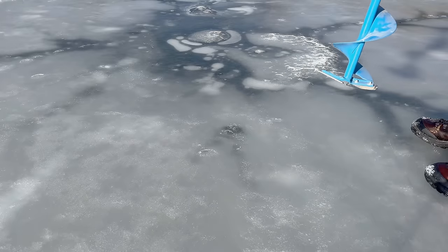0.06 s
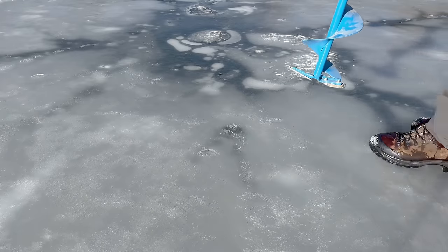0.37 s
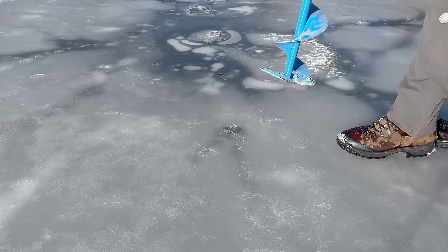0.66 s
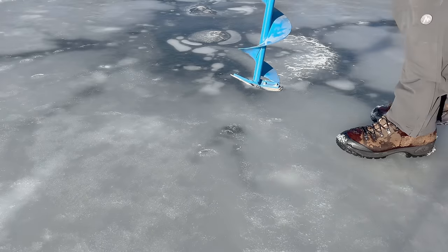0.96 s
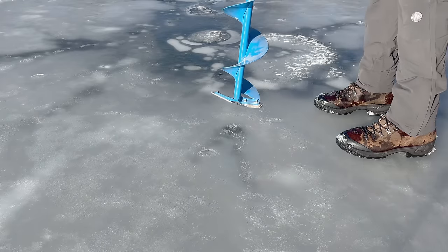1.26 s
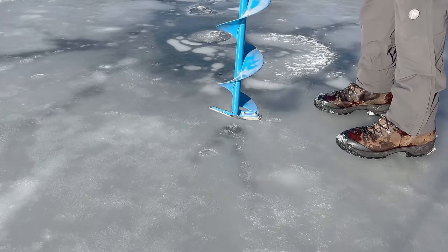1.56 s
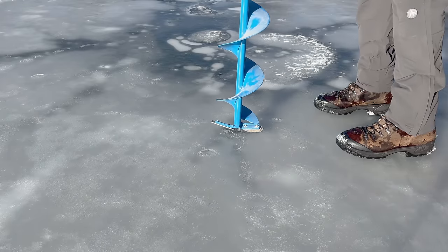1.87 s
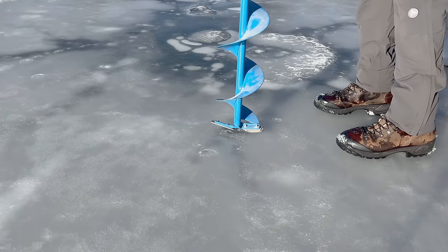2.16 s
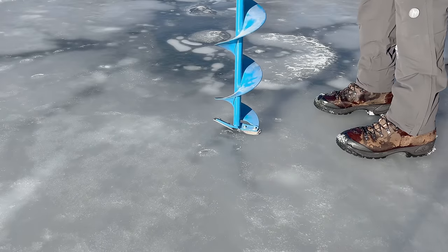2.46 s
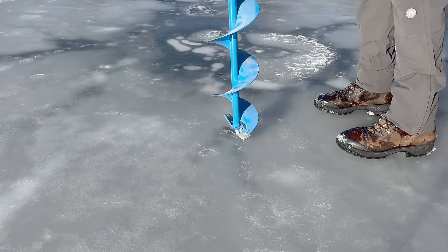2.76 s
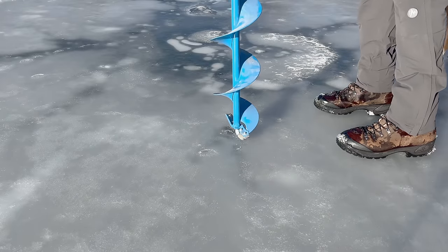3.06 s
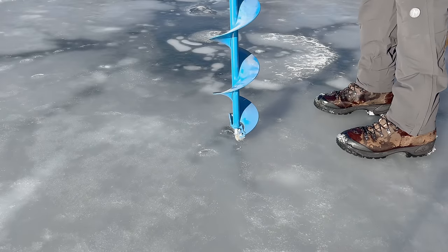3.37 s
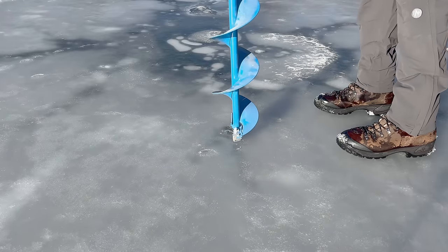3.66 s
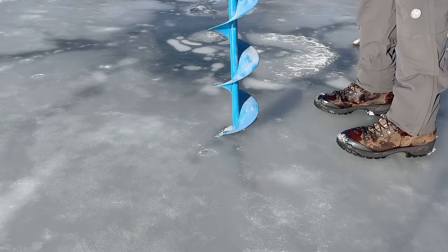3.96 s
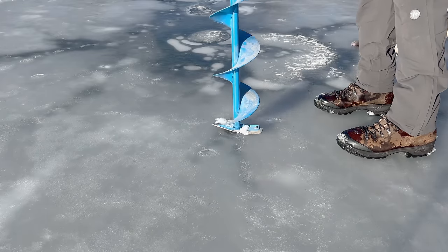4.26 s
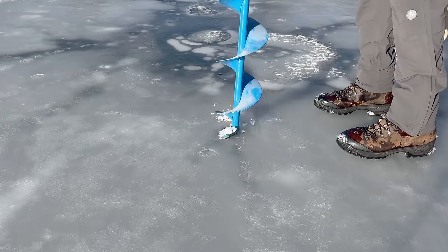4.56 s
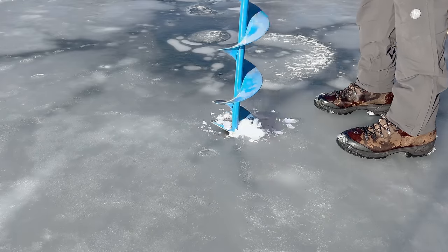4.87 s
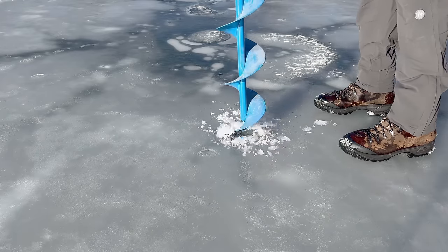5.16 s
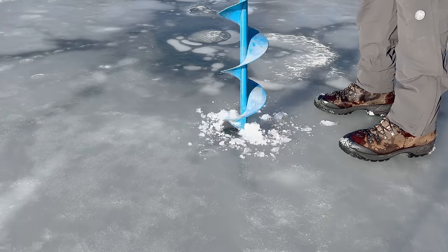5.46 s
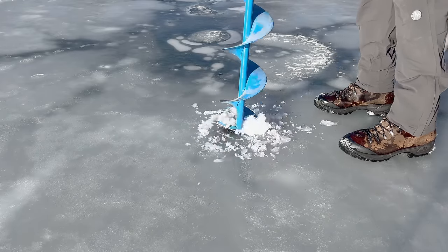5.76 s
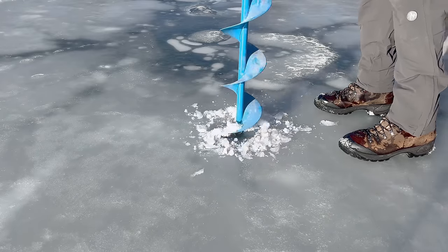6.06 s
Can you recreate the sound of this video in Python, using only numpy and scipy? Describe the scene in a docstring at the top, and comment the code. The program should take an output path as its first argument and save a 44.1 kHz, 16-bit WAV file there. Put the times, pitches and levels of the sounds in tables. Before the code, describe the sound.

Boots crunch on lake ice, then a hand auger clanks down, scrapes, and starts grinding and chipping into the ice.

```python
"""A frozen lake in the open air, heard through two closely spaced microphones.
Boots crunch up, breaking the crust by brittle fracture, and a steel hand auger is set down on the ice.
As it is cranked, the blades first skate in short stick-slip scrapes while the handle clacks, then bite:
they shave and chip the ice. These forces shake the ice sheet and drive the modes of the steel spiral."""
import sys
import numpy as np
from scipy import signal
from scipy.fft import rfft, irfft, next_fast_len
from scipy.io import wavfile

SR = 44100
rng = np.random.default_rng(int(sys.argv[2]) if len(sys.argv) > 2 else 0)


def unload_audio(sound):
    """Save the sound as a 16-bit wav file, at the path given as the first command line argument."""
    columns = np.transpose(np.atleast_2d(sound))
    # keep every value between -1 and 1, then stretch to whole-number steps
    steps = np.round(np.clip(columns, -1, 1) * 32767)
    wavfile.write(sys.argv[1], SR, steps.astype(np.int16))


N = 269892
TIME = np.arange(N) / SR


def from_db(db):
    """Amplitude ratio of a level in decibels."""
    return 10 ** (np.asarray(db) / 20)


def unit_rms(x):
    """Normalisation to unit power."""
    return x / np.sqrt(np.mean(x ** 2) + 1e-20)


def envelopes(rows):
    """Linear interpolation in decibels: one gain curve per level column, silent outside its span."""
    times, *columns = np.transpose(rows)
    inside = (TIME >= times[0]) * (TIME <= times[-1])
    return [from_db(np.interp(TIME, times, column)) * inside for column in columns]


def over_hz(rows, at):
    """Interpolation of each column on a logarithmic frequency axis."""
    hz, *columns = np.transpose(rows)
    return [np.interp(np.log(at), np.log(hz), column) for column in columns]


def response(spectrum, size=8192):
    """Minimum-phase impulse response of a spectrum, falling 24 dB per octave beyond its ends."""
    hz = np.maximum(np.arange(size // 2 + 1) * SR / size, 1)
    octaves_out = np.abs(np.log2(hz / np.clip(hz, spectrum[0][0], spectrum[-1][0])))
    level_db = np.maximum(over_hz(spectrum, hz)[0] - 24 * octaves_out, -90)
    cepstrum = irfft(np.log(from_db(level_db)))[:size // 2]
    cepstrum[1:] *= 2
    return irfft(np.exp(rfft(cepstrum, size)))[:size // 2]


def through(x, impulse):
    """Convolution of each path with an impulse response."""
    return signal.oaconvolve(x.astype(np.float32), impulse[None].astype(np.float32), axes=1)[:, :N]


def coloured(x, spectrum):
    """Source-filter model: a steady excitation takes on a spectrum, at unit power."""
    return unit_rms(through(x, response(spectrum)))


def knock(force, spectrum):
    """Response of a heavily damped body: a unit impulse gives a peak of 1."""
    impulse = response(spectrum)
    return through(force, impulse / np.abs(impulse).max())


def ring(hz, t60):
    """Free vibration of a struck mode: a damped sine of unit amplitude."""
    t = TIME[:SR // 3]
    return np.sin(2 * np.pi * hz * t) * np.exp(-np.log(1000) * t / t60)


def resonate(hz, t60):
    """Forced vibration: impulse response of a mode with unit gain at resonance."""
    t, damping = TIME[:SR // 3], np.log(1000) / t60
    return 2 * damping / SR * np.cos(2 * np.pi * hz * t) * np.exp(-damping * t)


def decay_from(start, decay_s):
    """Exponential decay from a sudden onset, lasting twenty time constants."""
    age = (TIME - start) / decay_s
    return (age >= 0) * (age < 20) * np.exp(-np.clip(age, 0, 20))


def drift(rate):
    """Random modulation: straight lines between Gaussian values, rate of them a second."""
    return np.interp(TIME * rate, np.arange(N // 20), rng.standard_normal(N // 20))


def shifting(x, depth, rate, q=18, count=16):
    """Randomly modulated resonances: treble peaks come and go independently."""
    pitches = np.geomspace(2200, 9000, count) * rng.uniform(.98, 1.02, count)
    peaks = (signal.lfilter(*signal.iirpeak(hz, q, fs=SR), x) for hz in pitches)
    return unit_rms(x + depth * sum(drift(rate) * peak for peak in peaks))


def grains(per_s, spread_db, clump_db, clump_rate):
    """Shot noise: tiny impulses of uneven size, independent on three paths but swelling together."""
    clicks = np.zeros((3, N))
    born = rng.random((3, N)) < per_s / SR
    sizes = from_db(spread_db * np.minimum(rng.exponential(1, born.sum()), 4))
    clicks[born] = sizes * rng.choice([-1, 1], born.sum())
    return clicks * from_db(clump_db * np.clip(drift(clump_rate), -2, 2))


# The three rows of an excitation are the direct, left-scattered and right-scattered paths: (delay [s])
PATH_DELAYS = [0, .0007, .0012]
def contacts(rows, crumble, crumble_s):
    """Impact force: for each (time [s], level [dB]), an impulse and a decaying shower of smaller ones."""
    force = np.zeros((3, N + SR))
    decay = np.exp(-TIME[TIME < 7 * crumble_s] / crumble_s)
    for s, level_db in rows:
        blow = crumble * decay * rng.standard_normal((3, len(decay)))
        blow[:, 0] += 1
        for path, delay in enumerate(PATH_DELAYS):
            start = int((s + delay) * SR)
            force[path, start:start + len(decay)] += from_db(level_db) * blow[path]
    return force[:, :N]


def stray_clicks(per_s, spread_db):
    """Poisson process: lone impulses, each arriving along all three paths."""
    clicks, born = np.zeros(N), rng.random(N) < per_s / SR
    clicks[born] = from_db(spread_db * rng.uniform(-1.1, 1, N)[born])
    return np.array([np.roll(clicks, int(delay * SR)) for delay in PATH_DELAYS])


def stroke(length, swell_db, attack_s=0.03, release_s=0.027, swell_share=0.79):
    """Envelope of sliding friction: the contact catches, swells to full level and lets go."""
    age = TIME[:SR]
    attack = np.clip(age / attack_s, 0, 1)
    release = np.exp(-np.maximum(age - length, 0) / release_s)
    swell = from_db(-swell_db * np.clip(1 - age / (swell_share * length), 0, 1))
    return attack * release * swell


def stick_slip(rows, stutter_db=3, stutter_per_s=60):
    """Stick-slip friction drives one resonance per stroke; the tone takes the energy of the stroke."""
    out = np.zeros((3, N + 2 * SR))
    for start, length, hz, t60, level_db in rows:
        friction = rng.standard_normal((3, SR)) * stroke(length, swell_db=3.5)
        friction *= from_db(stutter_db * (drift(stutter_per_s)[:SR] + 0.5))
        tone = signal.fftconvolve(friction, resonate(hz, t60)[None], axes=1)
        tone *= (np.linalg.norm(friction, axis=1) / np.linalg.norm(tone, axis=1))[:, None]
        first = int(start * SR)
        out[:, first:first + tone.shape[1]] += from_db(level_db) * tone
    return out[:, :N]


# Spectrum of the hush over the lake: (frequency [Hz], level [dB])
AIR_SPECTRUM = [(15, -30), (25, -17), (59, -10.5), (114, -10), (1040, -17), (1230, -18.5), (3160, -24.5),
                (3430, -26), (5730, -26), (13600, -30), (16000, -41)]
def open_air():
    """Partially coherent noise: a faint hush, part of it common to both microphones."""
    hush = coloured(rng.standard_normal((3, N)), AIR_SPECTRUM)
    return from_db(-67.5) * (0.55 * hush[0] + hush[1:])


def low_rumble(pressure, full_lean_db=-35.5, exponent=2.9):
    """Amplitude-modulated noise: a faint low rumble that swells during the heaviest cutting."""
    swell = (pressure / from_db(full_lean_db)) ** exponent
    return from_db(-65) * swell * coloured(rng.standard_normal((3, N)), [(30, -4), (60, 10), (100, 2)])


# Spectrum of rubbing cloth: (frequency [Hz], level [dB])
CLOTH_SPECTRUM = [(1470, -7.5), (2500, -4), (4650, -3.5), (5270, -5), (7770, -5.5), (14200, -9),
                  (15200, -9), (16000, -29)]
def trousers(gain):
    """Friction noise: dense tiny slips of cloth merge into a swish."""
    cloth = coloured(grains(per_s=14000, spread_db=4.5, clump_db=1.8, clump_rate=21.6), CLOTH_SPECTRUM)
    return from_db(1.1) * gain * shifting(cloth, depth=0.4, rate=46)


# Pieces of grit cracking under a boot: (time [s], level [dB], frequency [Hz])
GRIT_CRACKS = [(.5522, -28, 4750), (0.5561, -22, 5500), (0.5563, -26, 8200), (.5922, -30, 3570),
               (.602, -33, 3490), (.6345, -34, 4500), (.6842, -28, 5170), (0.6878, -26, 3880),
               (0.6905, -19, 1900), (0.695, -26.5, 3250), (0.712, -26, 4730), (0.741, -30, 4500),
               (.7458, -32, 7840), (1.0715, -32.5, 6700), (1.229, -38.5, 10300)]
# Spectrum of their ticks: (frequency [Hz], level [dB])
GRIT_SPECTRUM = [(1500, 11), (3800, -1), (8000, -2), (15000, -11)]
def grit(fine_grit):
    """Brittle fracture: each piece ticks and pings at its natural frequency; fine grit only ticks."""
    pings = np.zeros((3, N))
    for s, level_db, hz in GRIT_CRACKS:
        crack = contacts([(s, level_db)], crumble=0.066, crumble_s=.002)
        pings += through(crack, ring(hz, t60=0.0052)[:SR // 20])
    cracks = contacts([row[:2] for row in GRIT_CRACKS], crumble=0.062, crumble_s=.002)
    return from_db(-2) * pings + knock(from_db(-3.5) * cracks + fine_grit, GRIT_SPECTRUM)


# Snaps of the ice crust under a sole: (time [s], level [dB])
CRUST_SNAPS = [(0.092, -27), (0.15, -21.5), (0.182, -28), (0.202, -25), (0.222, -25.5), (0.246, -23.5),
               (0.26, -24.5), (0.282, -27), (0.323, -25), (0.348, -20), (0.374, -26), (0.433, -26),
               (0.467, -29), (0.493, -20), (0.524, -38), (0.542, -38), (0.574, -17.5), (0.606, -26.5),
               (0.615, -18), (0.639, -23.5), (0.711, -34), (0.788, -28), (0.85, -26), (0.875, -28),
               (0.899, -39), (0.954, -39), (1.097, -28.5), (1.145, -28), (1.162, -33), (1.177, -27),
               (1.24, -39), (1.255, -39), (1.267, -32), (1.31, -29), (1.355, -47), (1.394, -35),
               (1.419, -36.5), (1.44, -35), (1.466, -42), (1.579, -40.5), (1.601, -52), (1.675, -51),
               (1.845, -49), (2.084, -56), (2.173, -49), (2.315, -50)]
# Spectrum of a snap: (frequency [Hz], level [dB])
SNAP_SPECTRUM = [(40, -25), (200, 1.5), (450, 6), (700, -3.5), (1000, -9.5), (1600, -7.5), (2600, -23),
                 (6000, -69), (15000, -45)]
def crust(gain, first_crack_db=-11, give_s=.0016):
    """Two-stage fracture: a faint crack, then the crust gives way; lesser snaps fill the gaps."""
    first_cracks = [(s, level_db + first_crack_db) for s, level_db in CRUST_SNAPS]
    breaks = [(s + give_s, level_db) for s, level_db in CRUST_SNAPS]
    lesser = from_db(8.5) * gain * stray_clicks(per_s=30, spread_db=3.0)
    return knock(contacts(first_cracks + breaks, crumble=0.06, crumble_s=0.003) + lesser, SNAP_SPECTRUM)


# Footfalls: (time [s], heel level [dB], loss per slap [dB], roll level [dB])
FOOTFALLS = [(0.6736, -18.5, 17, -50), (1.0395, -15.5, 6, -30)]
# Spectrum of a sole on ice: (frequency [Hz], level [dB])
THUD_SPECTRUM = [(40, -23), (100, -2.5), (165, 1.5), (230, -0.5), (330, -4), (600, -15.5), (1500, -38)]
def footfalls(slap_gap_s=.0142, roll_s=0.091):
    """Impact excitation: heel, ball and toe slap, the sole rolls flat; the heaviest slap rings the ice."""
    slaps = [(s + k * slap_gap_s, heel_db - k * loss_db)
             for s, heel_db, loss_db, _ in FOOTFALLS for k in range(3)]
    roll = sum(from_db(roll_db) * decay_from(s, roll_s) for s, _, _, roll_db in FOOTFALLS)
    soles = roll * coloured(grains(per_s=500, spread_db=2, clump_db=-2, clump_rate=110), THUD_SPECTRUM)
    thuds = knock(contacts(slaps, crumble=0.012, crumble_s=0.007), THUD_SPECTRUM)
    heaviest = max(slaps, key=lambda row: row[1])
    sheet = through(contacts([heaviest], crumble=0.011, crumble_s=0.026), ring(hz=178, t60=.25))
    return thuds + soles + from_db(-8) * sheet


# Walking up and coming to rest: (time [s], crunch level [dB], swish level [dB])
WALK_LEVELS = [(0.0, -39.5, -47), (0.206, -44.5, -55.5), (0.4, -44.5, -49.5), (0.532, -41, -46.5),
               (0.72, -40, -48.5), (0.87, -39.5, -50), (1.018, -44, -54), (1.068, -40.5, -47.5),
               (1.282, -47, -57.5), (1.56, -62, -68), (1.732, -75, -88), (1.82, -82.5, -88)]
# Spectrum of crust ground underfoot: (frequency [Hz], level [dB])
CRUNCH_SPECTRUM = [(15, -54), (25, -11), (49, -1.5), (133, -4.5), (173, -3.5), (421, -4.5), (535, -3.5),
                   (962, -6), (1620, -9.5), (3470, -20), (4500, -28), (5850, -60), (9900, -120)]
# Squeaks of rubber soles: (start [s], duration [s], frequency [Hz], t60 [s], level [dB])
RUBBER_SQUEAKS = [(0.705, 0.027, 890, .03, -41.5), (0.845, 0.017, 950, 0.017, -45),
                  (1.345, 0.014, 1240, 0.027, -49.5)]
def boots():
    """Granular crushing: many small fractures make the crunch, joined by the other sounds of walking."""
    crunch_gain, swish_gain = envelopes(WALK_LEVELS)
    fractures = grains(per_s=3000, spread_db=1.5, clump_db=2.0, clump_rate=120)
    crunch = crunch_gain * coloured(fractures, CRUNCH_SPECTRUM)
    swish = trousers(swish_gain)
    fine_grit = from_db(3.5) * swish_gain * stray_clicks(per_s=14, spread_db=6.0)
    return crunch + swish + crust(crunch_gain) + grit(fine_grit) + footfalls() + stick_slip(RUBBER_SQUEAKS)


# Modes of the steel spiral: (frequency [Hz], t60 [s], struck [dB], skating [dB], biting [dB])
SPIRAL_MODES = [(180, .16, -24, 9, -8), (487, .28, -30, 0, -1), (535, .15, -30, -10, -5),
                (609, .15, -16, -5, -7), (850, .24, -30, 3, -3), (975, .12, -24, 2, 4),
                (1049, .18, -12, -14, -16), (1105, .1, -19, -5, -3), (1228, .22, -16, 8, -4),
                (1344, .44, -19.5, -5, 7), (1420, .19, -16, -20, -8), (1509, .1, -26, -12, -7),
                (1750, .33, -31, -14, -18), (1946, .12, -19, -12, -10), (2110, .25, -24, -14, -20),
                (2210, .13, -18, 2, -15), (2363, .13, -18, 0, -12), (2420, .16, -21, 1, -10),
                (2490, .18, -23, -8, -8), (2557, .2, -21, -6, -1), (2640, .16, -23, -8, -10),
                (2790, .12, -21, -6, -12), (2920, .14, -25, -8, -10), (3343, .45, -40, -2, -6),
                (3555, .3, -39, -10, -19), (3600, .25, -43, -10, -17), (3700, .12, -31, -3, -8),
                (3963, .1, -38, -14, -13), (4155, .085, -11, -2, -7), (4478, .25, -36, -8, -7),
                (4752, .14, -27, 0, -3), (4960, .1, -24, 2, -4), (5165, .17, -28, 0, -12),
                (5329, .15, -33, -8, -9), (5735, .18, -27, 1, -6), (5947, .14, -16, -20, -26),
                (6174, .12, -36, -10, -3), (6934, .15, -35, -12, -5), (7366, .15, -28, -12, -4),
                (7418, .16, -22, -16, -20), (7505, .16, -19, -12, -11), (7666, .14, -26, -14, -16),
                (7865, .17, -28, -14, -16), (8080, .12, -33, 1, -9), (8470, .12, -38, 3, -16),
                (10965, .09, -20, 2, -18)]
# Shared by the many weak modes of its thin rim: (t60 [s], struck [dB], skating [dB], biting [dB])
RIM_MODES = (0.13, -42.5, -2, -4)
STRUCK, SKATING, BITING = range(3)
def spiral(mode, contact):
    """Modal superposition: the auger's impulse response, weighted by the kind of contact."""
    main = sum(from_db(levels[contact]) * mode(hz, t60) for hz, t60, *levels in SPIRAL_MODES)
    rim_t60, *rim_levels = RIM_MODES
    pitches = np.geomspace(1600, 11500, 90) * rng.uniform(.98, 1.02, 90)
    rim = sum(rng.uniform(-.8, 1) * mode(hz, rim_t60) for hz in pitches)
    return main + from_db(rim_levels[contact]) * rim


# The blades land and rattle to rest: (time [s], level [dB])
LANDING_BLOWS = [(1.8778, -22), (1.8811, -13.5), (1.8843, -15.5), (1.8945, -15.5), (1.922, -31),
                 (1.9315, -30), (1.9445, -33.5)]
# Spectra of the splintering surface and of the struck ice sheet: (frequency [Hz], level [dB])
CRUSH_SPECTRUM = [(29, -62), (70, -23), (171, -4), (428, -19), (601, -38), (678, -9), (1070, -3),
                  (2270, -9), (2750, -11), (3100, -17), (4040, -19), (5670, -15), (7570, -15.5),
                  (8600, -24), (11100, -23), (16000, -47)]
BOOM_SPECTRUM = [(30, -19), (60, -13), (100, -14), (150, -1.5), (200, -4.5), (320, -16), (900, -16),
                 (2500, -28.5)]
def landing():
    """Inelastic impact: the blades crush the surface, the sheet booms, the hardest blow rings the steel."""
    crush = knock(contacts(LANDING_BLOWS, crumble=0.16, crumble_s=.011), CRUSH_SPECTRUM)
    hardest = max(LANDING_BLOWS, key=lambda row: row[1])
    steel = through(contacts([hardest], crumble=.012, crumble_s=.008), spiral(ring, STRUCK))
    boom = knock(contacts(LANDING_BLOWS, crumble=0.087, crumble_s=0.075), BOOM_SPECTRUM)
    return from_db(-2) * crush + from_db(-1) * steel + from_db(-22) * boom


# Knocks of the crank handle: (time [s], level [dB])
HANDLE_CLACKS = [(2.283, -54), (2.2905, -47), (2.297, -49), (2.9895, -44), (3.008, -44), (3.0813, -33),
                 (3.587, -35), (3.593, -42)]
# Spectrum of a clack: (frequency [Hz], level [dB])
CLACK_SPECTRUM = [(100, -14), (450, 3.5), (900, 3.5), (1350, 4), (1800, -1), (2600, -11), (4000, -25),
                  (12000, -46)]
def handle(rebound_s=0.00322, rebound_db=-13):
    """Backlash: play in the handle ends in an impact that rebounds once."""
    rebounds = [(s + rebound_s, level_db + rebound_db) for s, level_db in HANDLE_CLACKS]
    return knock(contacts(HANDLE_CLACKS + rebounds, crumble=0.096, crumble_s=0.0059), CLACK_SPECTRUM)


# Squeals of a sticking blade: (start [s], duration [s], frequency [Hz], t60 [s], level [dB])
BLADE_SQUEALS = [(2.31, .1, 1200, .05, -75), (2.45, 0.19, 1226, 0.18, -58.5),
                 (2.71, 0.047, 1117, 0.059, -50), (3.235, 0.042, 3345, 0.34, -65),
                 (2.72, 0.072, 2190, .08, -57), (2.73, 0.062, 4930, .04, -59), (2.74, .06, 5120, .08, -58),
                 (3.68, 0.12, 4165, 0.18, -52.5), (3.705, .11, 2520, .05, -61),
                 (3.705, 0.1, 2350, 0.091, -54.5), (3.686, 0.11, 985, 0.22, -48),
                 (3.68, 0.13, 843, 0.16, -53), (3.971, 0.42, 995, 0.093, -43.5),
                 (4.15, 0.13, 3774, 0.027, -47.5), (4.46, 0.055, 1358, 0.13, -36.5),
                 (4.546, 0.078, 1371, 0.16, -33), (4.6, .45, 1353, 0.46, -44), (4.99, 0.08, 1344, 0.2, -36),
                 (5.21, 0.1, 974, 0.054, -38.5), (5.59, .08, 1338, .12, -35.5), (5.6, .08, 1090, .04, -38),
                 (4.54, .6, 4900, .025, -46.5), (4.28, .65, 3760, .035, -49)]
# The steel is let go from a strain: (time [s], frequency [Hz], t60 [s], level [dB])
STRAIN_RELEASES = [(3.084, 1337, 0.29, -53), (3.31, 3345, .55, -62)]
def singing_steel():
    """Forced and free vibration: stick-slip makes the steel sing; on release it rings in one mode."""
    out = stick_slip(BLADE_SQUEALS)
    for s, hz, t60, level_db in STRAIN_RELEASES:
        out += through(contacts([(s, level_db)], crumble=0, crumble_s=.001), ring(hz, t60))
    return out


# Skating strokes: (start [s], duration [s], final level [dB], swell [dB], relative chatter [dB])
BLADE_SCRAPES = [(2.297, 0.066, -74, 1, 4), (2.375, 0.29, -58.5, 6.5, 1.5), (2.665, 0.13, -47.5, 13, 1.5),
                 (2.855, 0.067, -62, -1, 1), (3.082, .081, -71.5, -7, 3), (3.17, 0.13, -52, 12, 1),
                 (3.487, .17, -65.5, 0, 2.5), (3.661, .04, -52.5, -6, -1), (3.698, 0.12, -46, 4.5, -1)]
def scraping(pressure_db=-3):
    """Sliding friction: envelopes of pressure, chatter and shaving while the blades skate."""
    gains = np.zeros((3, N))
    for start, length, level_db, swell_db, chatter_db in BLADE_SCRAPES:
        first = int(start * SR)
        mix = from_db([[pressure_db], [chatter_db], [0]])
        gains[:, first:first + SR] += from_db(level_db) * mix * stroke(length, swell_db)
    return gains


# Weight on the handle, as the shaking of the ice: (time [s], level [dB])
HANDLE_LEAN = [(3.84, -60), (3.95, -55), (4.1, -46.5), (4.25, -42), (4.4, -43), (4.6, -38.5), (4.85, -38.5),
               (5.04, -38), (5.18, -48), (5.25, -43.5), (5.4, -42), (5.57, -40.5), (5.8, -40.5),
               (5.85, -50), (5.91, -44), (6.0, -49.5), (6.12, -42)]
# Cranking speed, as the strength of shaving; it sags as the handle comes round: (time [s], level [dB])
CRANK_SPEED = [(3.84, -70), (3.89, -54.5), (4.08, -42.5), (4.14, -51), (4.22, -38), (4.53, -39.5),
               (4.56, -39.5), (4.7, -37.5), (4.98, -39.5), (5.02, -36), (5.15, -40), (5.19, -45),
               (5.23, -35.5), (5.27, -40), (5.35, -48.5), (5.45, -39.5), (5.82, -36), (5.85, -42),
               (5.89, -35.5), (6.0, -48.5), (6.06, -41), (6.12, -35.5)]
# The blades dig in and judder: (centre time [s], duration [s], extra chatter [dB])
BLADE_JUDDERS = [(4.455, 0.13, 5), (4.59, 0.042, 6.5), (5.024, 0.058, 5), (5.257, 0.079, 3.5),
                 (5.486, 0.32, 4), (5.62, 0.14, 6)]
def cutting(lean_share=0.32):
    """Envelopes of pressure, chatter and shaving in the cut: chatter is a power law of load and speed."""
    lean, speed = envelopes(HANDLE_LEAN)[0], envelopes(CRANK_SPEED)[0]
    judder_db = sum(db * np.exp(-(2 * (TIME - s) / length) ** 2) for s, length, db in BLADE_JUDDERS)
    chatter = from_db(3.5 + judder_db) * lean ** lean_share * speed ** (1 - lean_share)
    return np.array([lean, chatter, from_db(-1.5) * speed])


# Spectrum of the shaken ice sheet: (frequency [Hz], level [dB])
SHEET_SPECTRUM = [(24, -50), (40, -53), (102, -18.5), (179, -10), (200, -6), (269, -11.5), (334, -3),
                  (415, -6), (472, -3), (610, -4), (767, -9), (850, -3.5), (1100, -19), (1870, -120)]
def ice_sheet(pressure):
    """Forced vibration: the blades shake the ice sheet in proportion to their pressure."""
    jolts = grains(per_s=900, spread_db=2.5, clump_db=2.0, clump_rate=70)
    return from_db(-1.5) * pressure * coloured(jolts, SHEET_SPECTRUM)


# Spectrum of blade chatter: (frequency [Hz], level [dB])
CHATTER_SPECTRUM = [(500, -22), (780, -5.5), (950, 2), (1150, 5.5), (1360, 3), (1520, -10.5), (2200, -6.5),
                    (3500, -46)]
def blade_chatter(gain):
    """Intermittent contact: rapid small blows of the blades merge into a midrange bark."""
    blows = grains(per_s=700, spread_db=1.5, clump_db=1.5, clump_rate=90)
    return from_db(-7) * gain * coloured(blows, CHATTER_SPECTRUM)


# Spectrum of shaved ice: (frequency [Hz], level [dB])
SHAVING_SPECTRUM = [(700, -10), (1600, -2), (2200, -3), (2900, -2.5), (3600, 0), (4350, -4), (4900, -2),
                    (5700, -3.5), (7800, -4), (9200, -10), (10500, -10.5), (13000, -10), (15800, -16.5)]
# A blade edge nicks the surface: (time [s], level [dB])
BLADE_NICKS = [(2.402, -49), (2.538, -45), (3.514, -49), (3.706, -36)]
def shaving(gain, bite):
    """Microfracture: the edge sheds hissing flakes, finer and brighter where it barely touches."""
    fractures = grains(per_s=4000, spread_db=3.2, clump_db=1.6, clump_rate=80)
    dust = grains(per_s=12000, spread_db=2.5, clump_db=1.2, clump_rate=120)
    frost = from_db(-7) * (1 - bite) * coloured(dust, [(7500, -12), (10000, 0), (14500, -3)])
    flakes = shifting(coloured(fractures, SHAVING_SPECTRUM), depth=.5, rate=35)
    # as the point of contact travels along the edge, narrow blade resonances come and go
    edge = shifting(flakes, depth=.8, rate=14, q=90, count=36)
    nicks = knock(contacts(BLADE_NICKS, crumble=0.18, crumble_s=.006), SHAVING_SPECTRUM)
    return from_db(-1.48) * gain * (edge + frost) + nicks


# Hard patches of ice under the blade: (time [s], time constant [s], level [dB], shard frequency [Hz])
HARD_PATCHES = [(4.072, .02, -41.5, 6450), (4.12, 0.016, -44, 3700), (4.193, .03, -44, 5370),
                (4.289, .02, -38, 7000), (4.358, .03, -43, 6300), (4.432, 0.025, -36, 6200),
                (4.545, 0.063, -34.5, 4800), (4.692, 0.034, -41, 5600), (4.725, 0.052, -37, 4800),
                (4.825, 0.022, -40.5, 4970), (4.876, .025, -36, 3810), (4.916, 0.016, -39, 3460),
                (4.953, .015, -38, 5000), (5.011, 0.058, -35.5, 6700), (5.204, 0.046, -40, 4870),
                (5.39, .02, -47, 5200), (5.455, 0.035, -43, 3830), (5.635, 0.026, -42, 4650),
                (5.772, 0.076, -36, 4900), (5.867, 0.032, -39, 6300), (5.889, 0.022, -42, 7200)]
def shattering():
    """Fracture cascade: a hard patch breaks in a run of cracks, coloured by the resonance of its shards."""
    cracks = coloured(grains(per_s=1000, spread_db=3, clump_db=2.5, clump_rate=170), SHAVING_SPECTRUM)
    out = np.zeros((3, N))
    for s, decay_s, level_db, hz in HARD_PATCHES:
        span = slice(int(s * SR), int(s * SR) + SR // 3)
        burst = from_db(level_db) * cracks[:, span] * decay_from(s, decay_s)[span]
        shards = signal.lfilter(*signal.iirpeak(hz, Q=7, fs=SR), burst)
        out[:, span] += burst + from_db(-0.5) * shards
    return from_db(-5) * out


# The largest chips breaking out: (time [s], crack level [dB], thump level [dB])
LARGE_CHIPS = [(4.072, -33, -38), (4.417, -22, -40), (4.475, -23, -39), (4.555, -16, -40),
               (4.582, -14.5, -36.5), (4.613, -18, -39), (4.643, -17, -45), (4.668, -30, -31),
               (4.751, -18, -33), (4.796, -19.5, -35), (4.835, -22.5, -31), (4.879, -26, -41),
               (4.893, -18, -33), (4.914, -17.5, -30), (4.952, -19.5, -31.5), (4.991, -20, -40),
               (5.006, -15.5, -34), (5.204, -21.5, -52), (5.229, -20.5, -48), (5.254, -19, -34),
               (5.302, -21, -33), (5.468, -23, -42), (5.553, -18.5, -34), (5.583, -23, -34.5),
               (5.628, -25, -32), (5.646, -20, -40), (5.735, -22, -37), (5.806, -17, -38),
               (5.987, -36, -37.5)]
# Spectrum of a chip's thump on the ice sheet: (frequency [Hz], level [dB])
THUMP_SPECTRUM = [(120, -14), (200, -7.5), (330, -4), (520, 2), (800, -3), (1300, -31)]
def chips(biting_pressure):
    """Sudden stress release: chips break out with a bark and a crackle; large ones thump the sheet."""
    small = from_db(8) * biting_pressure * stray_clicks(per_s=8.2, spread_db=6.0)
    cracks = [(s, db) for s, db, _ in LARGE_CHIPS]
    thumps = [(s, db) for s, _, db in LARGE_CHIPS]
    bark = knock(contacts(cracks, crumble=0.095, crumble_s=0.0079) + small, CHATTER_SPECTRUM)
    thump = knock(contacts(thumps, crumble=0.088, crumble_s=0.01), THUMP_SPECTRUM)
    crackle = knock(contacts(cracks, crumble=0.3, crumble_s=0.0055) + small, SHAVING_SPECTRUM)
    return from_db(-9.5) * bark + from_db(2) * thump + from_db(-16.5) * crackle


# How far the blades have sunk in: (time [s], bite [0 skating to 1 biting])
BLADE_BITE = [(3.55, 0.027), (3.75, 0.086), (4.3, 0.65)]
def drilling():
    """Forced vibration: the forces at the blades are heard directly and through the spiral's modes."""
    pressure, chatter_gain, shaving_gain = scraping() + cutting()
    bite = np.interp(TIME, *np.transpose(BLADE_BITE))
    shaking = ice_sheet(pressure)
    rumble = low_rumble(pressure)
    bark = blade_chatter(chatter_gain)
    hiss = shaving(shaving_gain, bite) + shattering()
    clacks = handle()
    force = shaking + bark + hiss + chips(bite * pressure)
    # ice gripping the blades changes which modes they drive
    skating = through(force * (1 - bite), spiral(resonate, SKATING))
    biting = through(force * bite + clacks / 2, spiral(resonate, BITING))
    return force + clacks + from_db(1.5) * skating + from_db(7.5) * biting + rumble


def place(paths, direction, left_lag_ms):
    """Spaced-pair stereo: direct sound differs in time and level; scattered sound is incoherent."""
    size = 2 * next_fast_len(N // 2 + SR // 4)
    hz = np.maximum(np.arange(size // 2 + 1) * SR / size, 1)
    share, pan_db = over_hz(direction, hz)
    share = np.clip(share, 0, 1)
    sides = from_db([pan_db / 2, -pan_db / 2])
    phase = np.pi * hz * left_lag_ms / 1000 * np.array([[1], [-1]])
    direct = sides * np.sqrt(share) * np.exp(-1j * phase)
    scattered = sides * np.sqrt(1 - share)
    # the centre of the pair keeps the colour of the source
    centre = np.sqrt(np.abs(direct.sum(0)) ** 2 + (scattered ** 2).sum(0)) / 2
    spectra = rfft(paths, size)
    return irfft((direct * spectra[0] + scattered * spectra[1:]) / centre)[:, :N]


# How each source reaches the pair: (frequency [Hz], direct share of power [0-1], left minus right [dB])
AUGER_DIRECTION = [(60, 0.14, 9), (151, 0.7, -3.5), (410, 1, -4), (1310, 0.99, -5.5), (2140, 0.4, -11),
                   (2480, 0.84, -6), (4140, 0.22, -2.5), (6150, 0.85, -0.5), (7700, 0, -4),
                   (12100, 0.57, -3), (15800, 0, -2)]
BOOTS_DIRECTION = [(60, 0.16, 4), (197, 0.93, -9), (690, 1, -8.5), (1610, 0.83, -7.5), (3270, 0.11, -7.5),
                   (7080, 0.083, -4.5), (15900, 0.053, -4.5)]
def scene():
    """Superposition: auger and boots, both louder on the right, add to the hush of the lake."""
    auger = place(landing() + drilling() + singing_steel(), AUGER_DIRECTION, left_lag_ms=-.18)
    walker = place(boots(), BOOTS_DIRECTION, left_lag_ms=.04)
    return auger + walker + open_air()


CUTOFF_HZ = 15800
def record(dry):
    """Band limiting: a steep elliptic low-pass removes the highest treble."""
    return signal.sosfilt(signal.ellip(12, .1, 80, CUTOFF_HZ, fs=SR, output="sos"), dry)


dry = scene()
out = record(dry)
unload_audio(out)
```